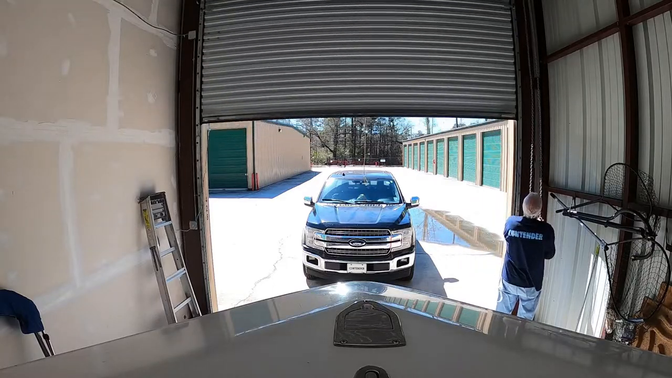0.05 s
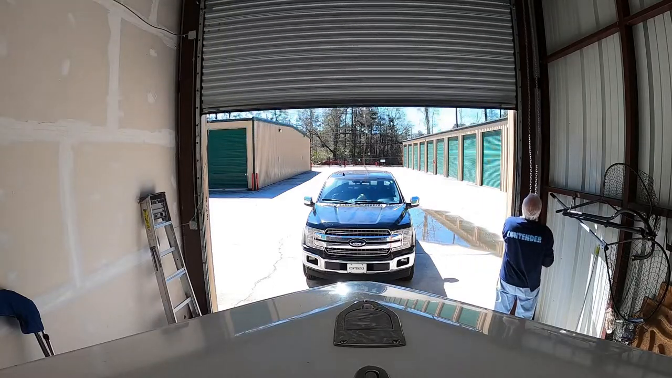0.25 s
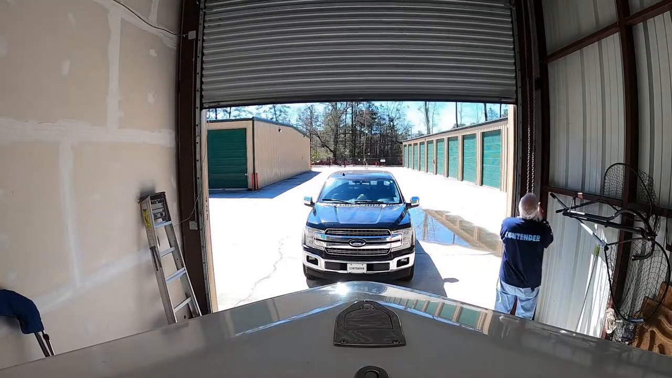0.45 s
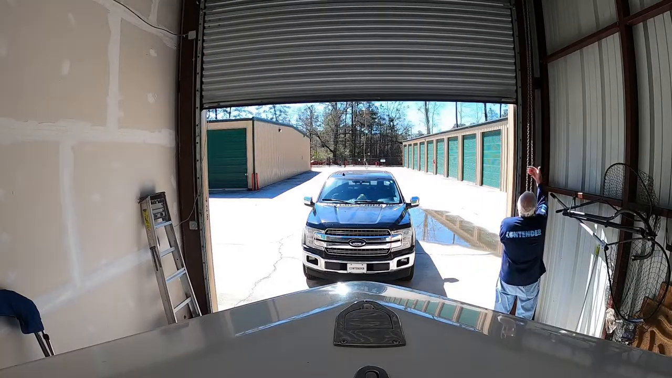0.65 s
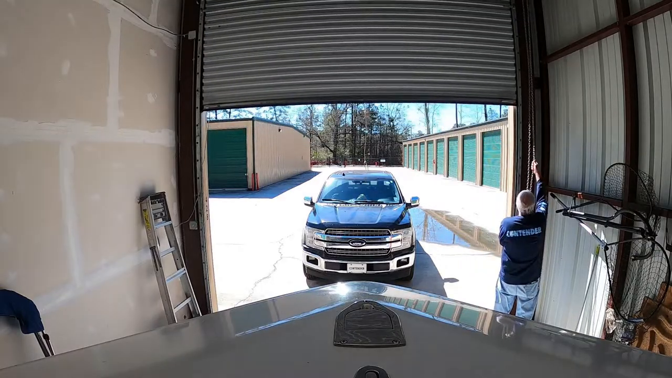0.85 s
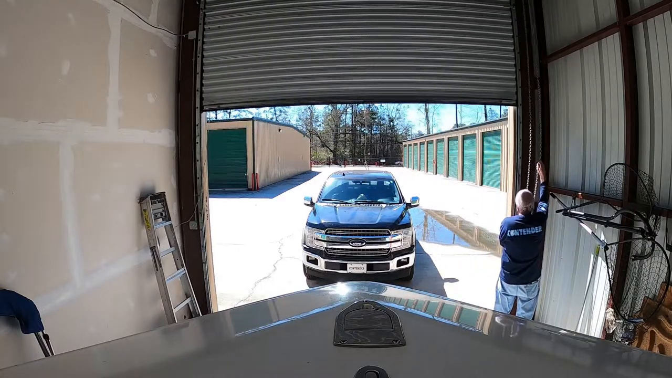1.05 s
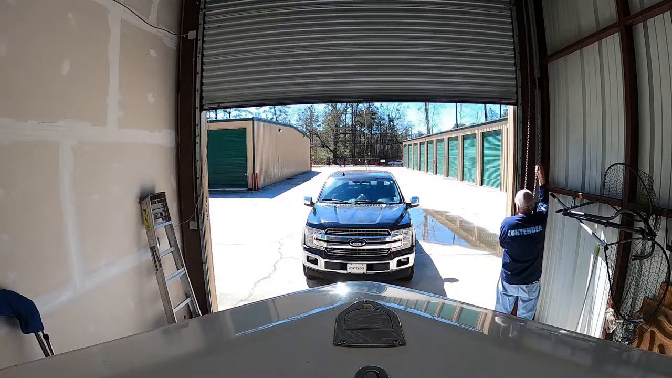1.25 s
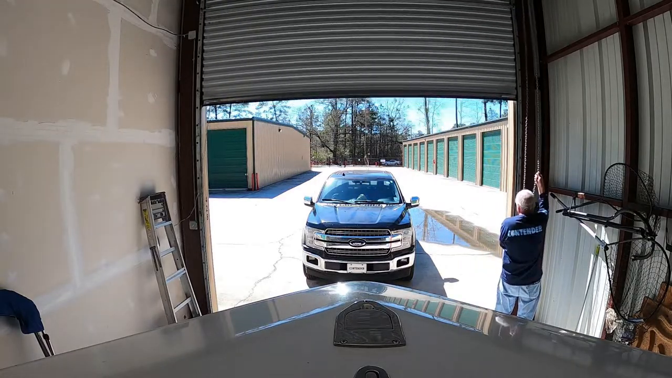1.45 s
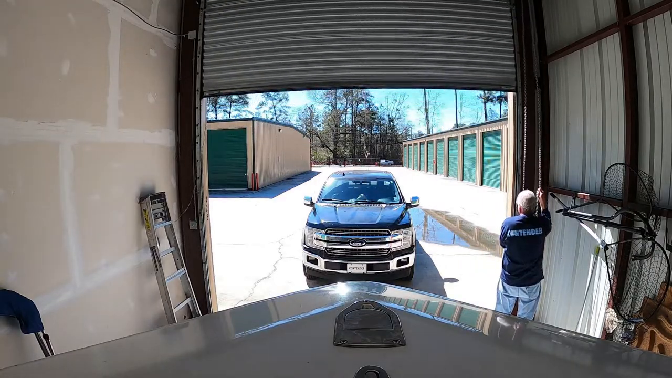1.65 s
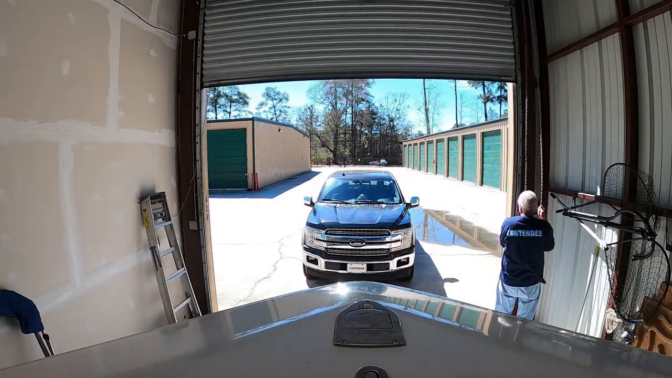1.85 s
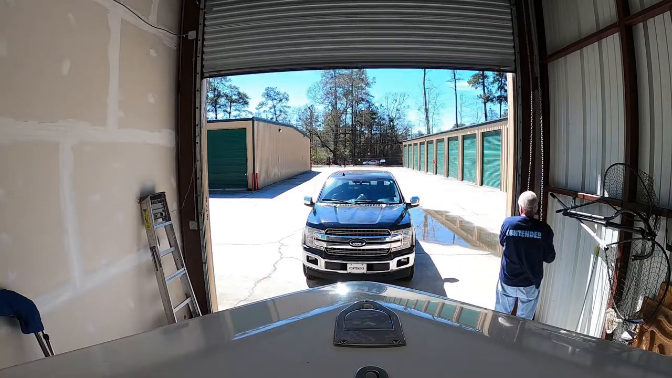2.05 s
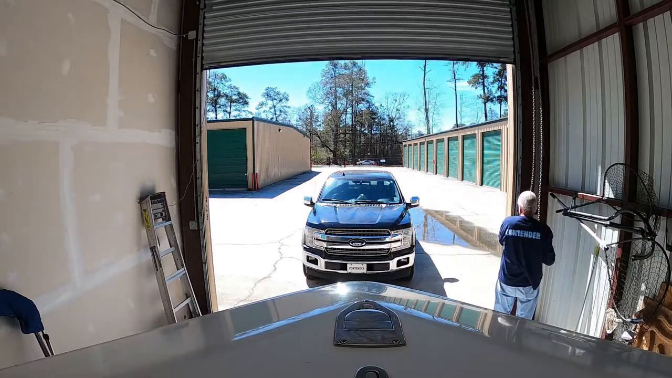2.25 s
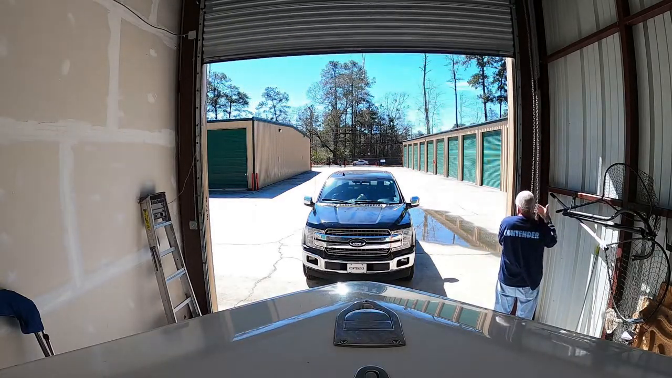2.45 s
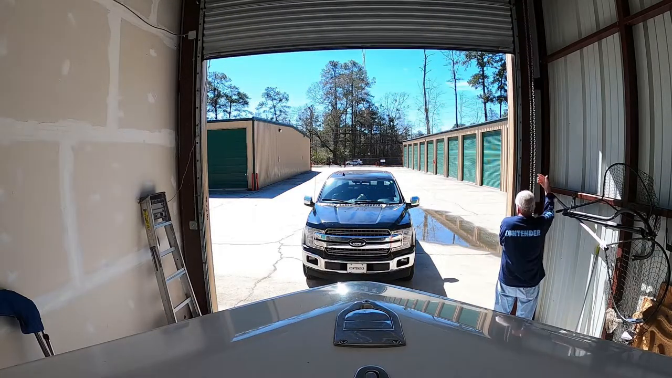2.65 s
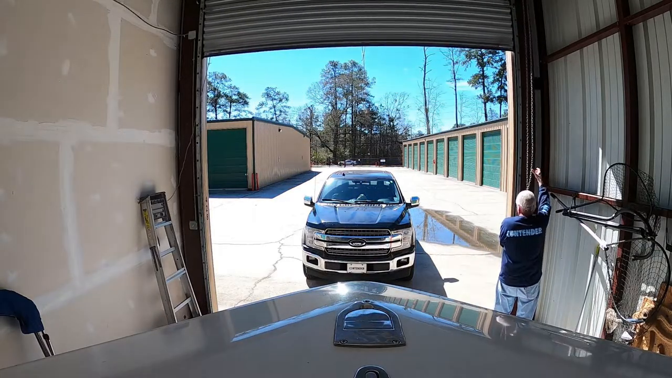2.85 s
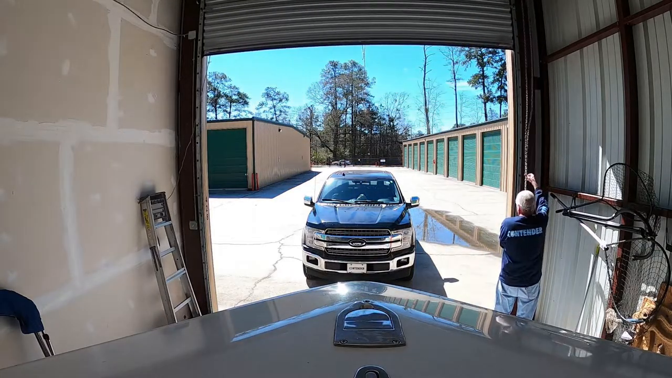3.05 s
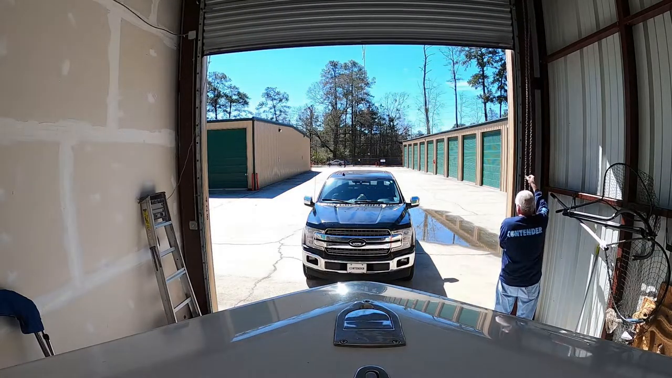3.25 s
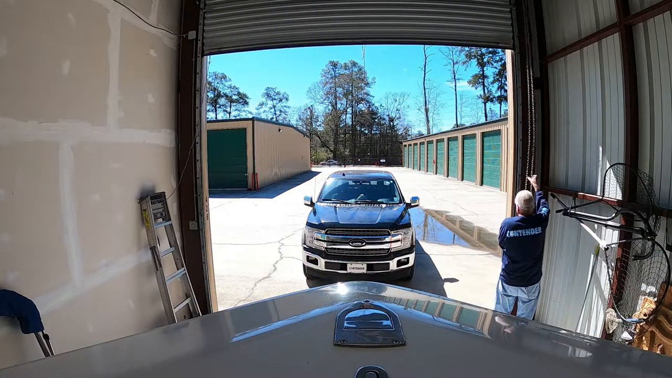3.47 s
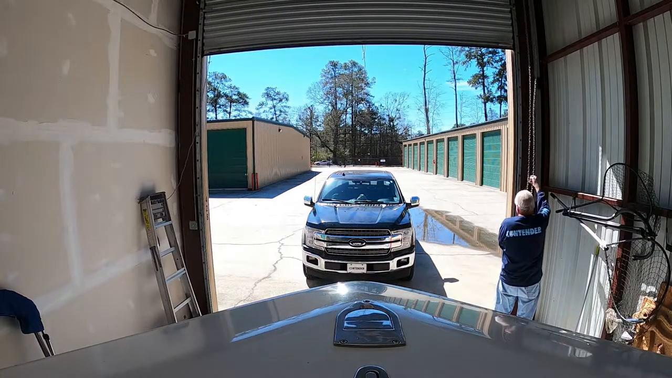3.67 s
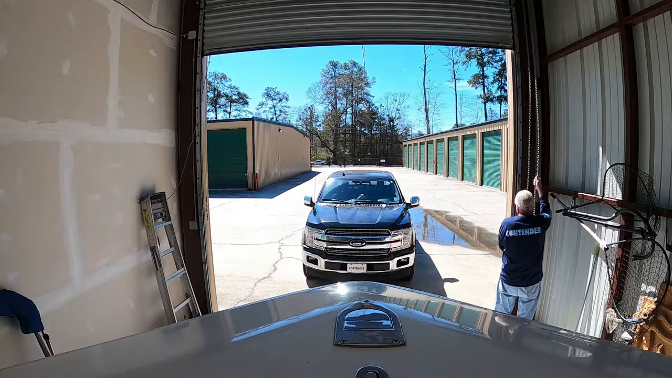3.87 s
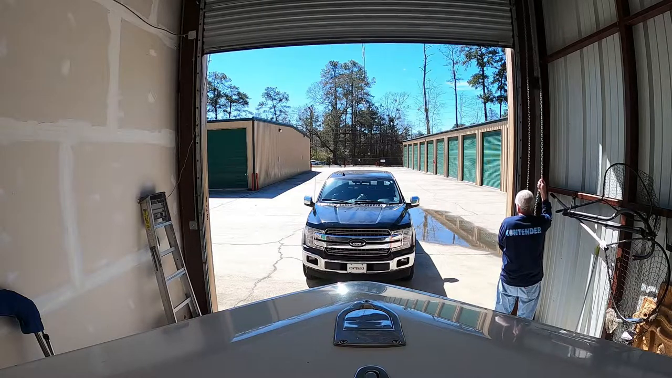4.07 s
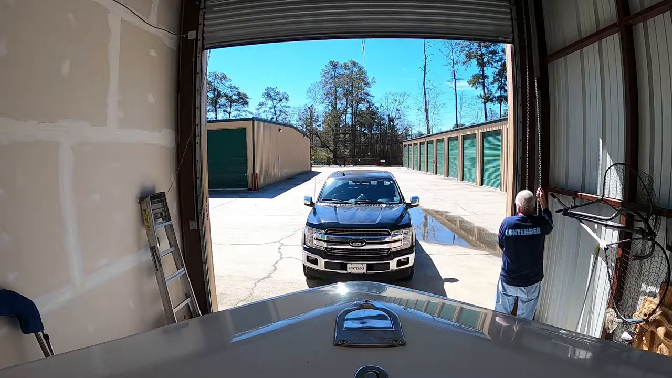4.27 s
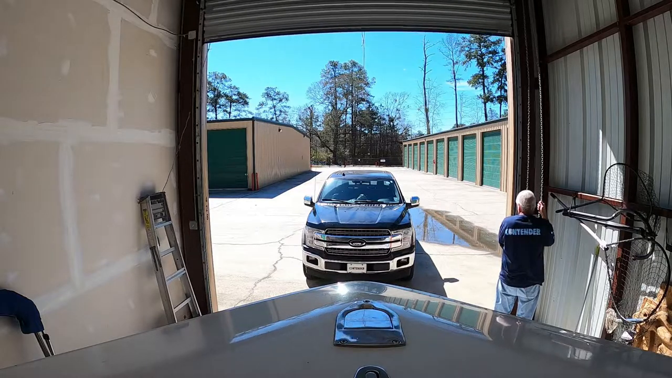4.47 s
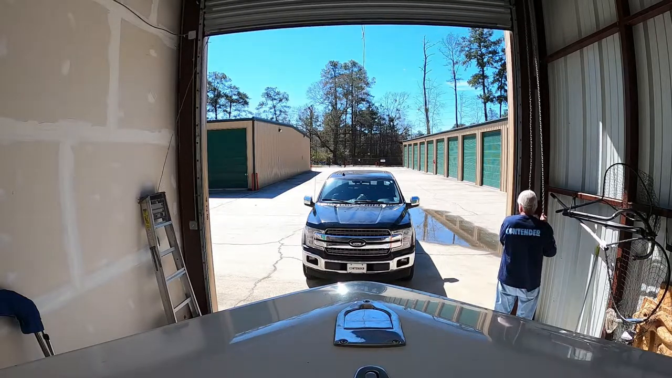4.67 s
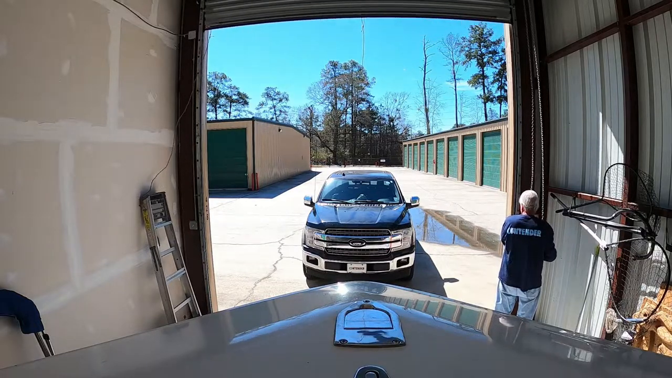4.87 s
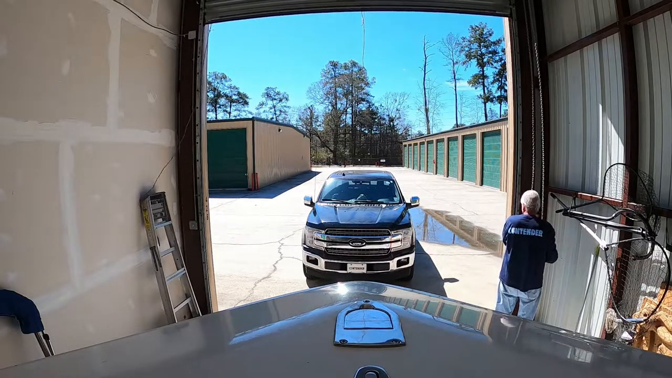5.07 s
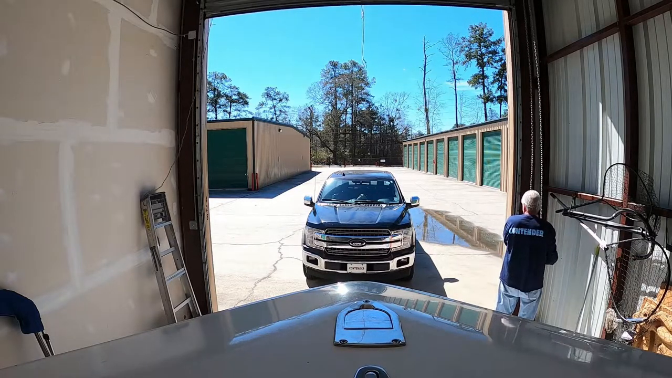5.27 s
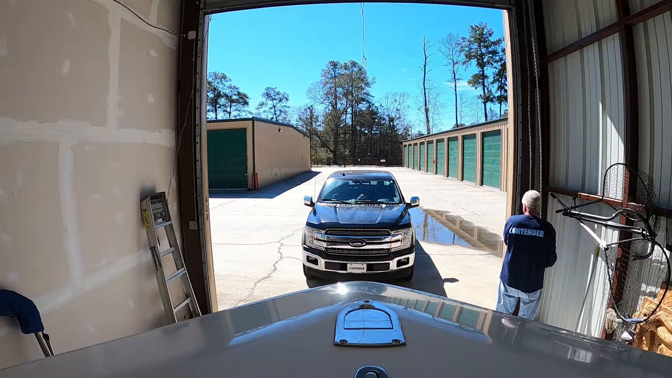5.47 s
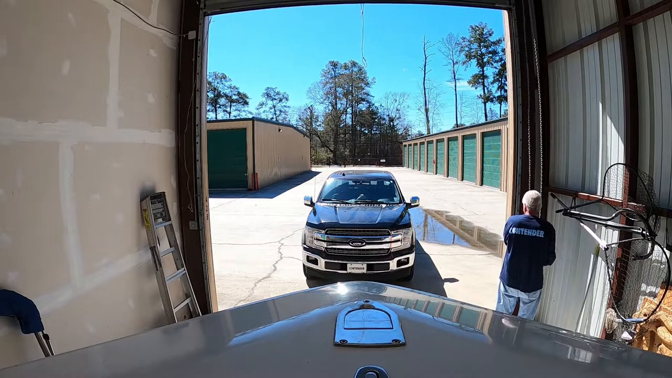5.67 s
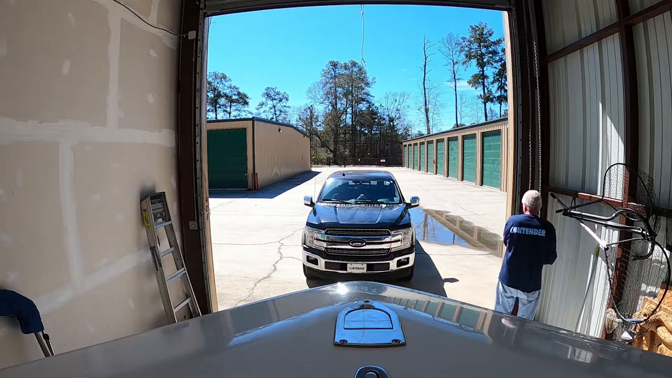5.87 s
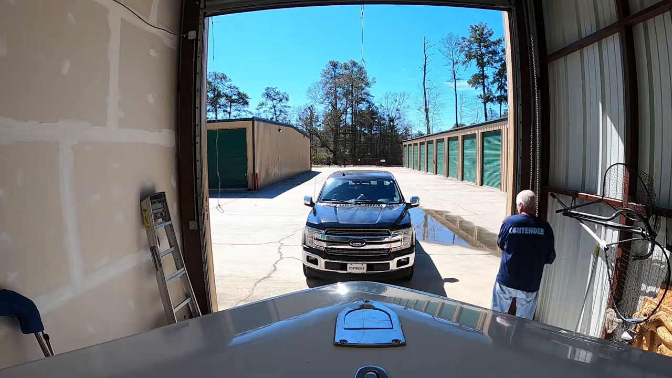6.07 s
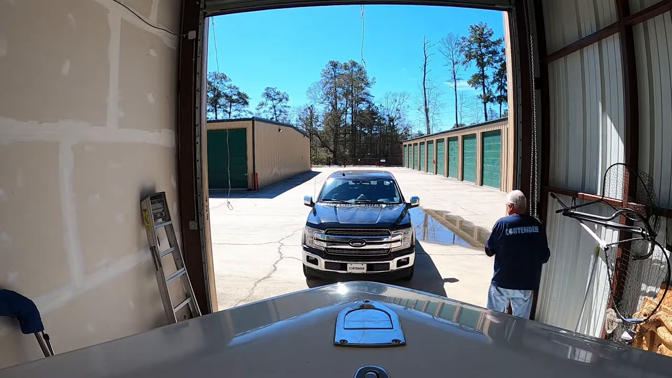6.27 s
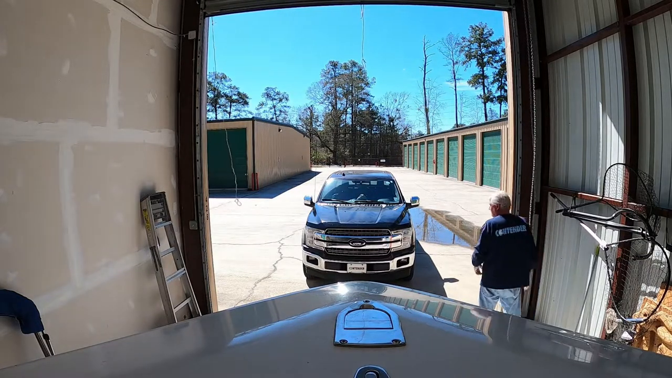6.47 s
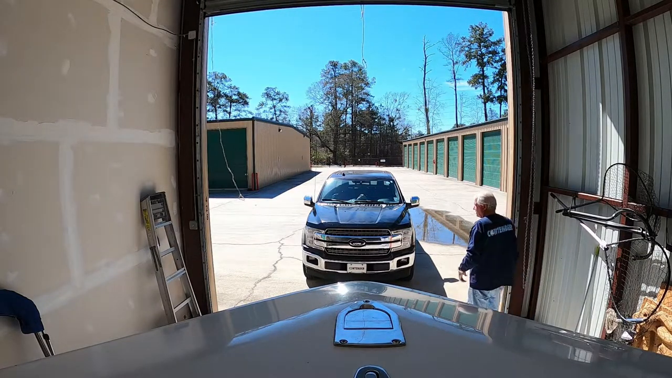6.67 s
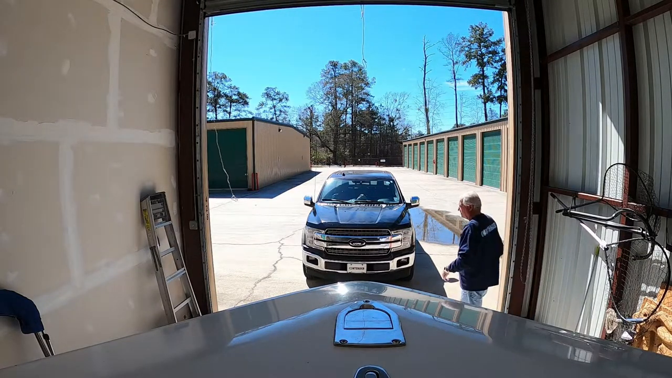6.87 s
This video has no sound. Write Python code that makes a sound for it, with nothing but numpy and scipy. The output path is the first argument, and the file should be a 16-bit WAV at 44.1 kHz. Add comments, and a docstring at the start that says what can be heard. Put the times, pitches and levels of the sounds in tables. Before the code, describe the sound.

Three hauls of a ribbed steel shutter, heard close in stereo within a hard, boomy hall. Ribs tick rapidly over the guides, the sheet rumbles and scrapes, loose hardware clanks and chain links chatter. Each burst slows as the pull ends; the longest lull holds only small clinks and distant hum. A downward metallic groan leads the last haul, which ends in heavy bangs, then a few tiny settling ticks and one soft late knock.

```python
"""Metal storage building: a corrugated steel roll-up door is hauled up by its hand chain in three pulls.
Contacts follow the door speed: ribs tick over the guides, the curtain rumbles, rattles and scrapes, the
roll knocks, hardware clanks with short ringing modes, the chain chatters. Timed noise bursts make bangs,
clacks and small ticks. As the last pull takes hold, a swept tone makes a low falling whoop in the sheet.
Decaying noise is the bare hall's answer to the contacts; a faint outdoor hum comes through the opening."""
import sys
import numpy as np
from scipy import signal
from scipy.fft import rfft, irfft, next_fast_len
from scipy.io import wavfile

SR = 44100
rng = np.random.default_rng(int(sys.argv[2]) if len(sys.argv) > 2 else 0)


def put_to_file(sound):
    """Save the sound as 16-bit audio at rate SR, in the file named by the first command-line argument."""
    columns = np.atleast_2d(sound).T  # one column per channel
    safe = np.clip(columns, -1, 1)
    whole_steps = np.round(safe * 32767)
    wavfile.write(sys.argv[1], SR, whole_steps.astype(np.int16))


N = 305172

# broad colour of the sheet steel: (frequency [Hz], gain [dB per Hz])
CURTAIN_COLOUR = [(22, -33.5), (55, -7.5), (85, -2.5), (170, -2), (260, -3), (400, -6), (750, -10),
                  (1000, -10.5), (1300, -13), (2000, -19), (2400, -22.5), (5000, -30), (8500, -41.5),
                  (14000, -53)]
# broad colour of struck steel: (frequency [Hz], gain [dB per Hz])
STRIKE_COLOUR = [(200, -4), (900, -1.5), (1800, 1), (3300, 3.5), (4600, -2), (6500, -4.5), (8500, -6.5),
                 (11000, -19), (15000, -31)]


def amp(db):
    """Decibels to gain."""
    return 10 ** (np.asarray(db) / 20)


def unit(x):
    """Scale to rms 1."""
    return x / np.sqrt(np.mean(x ** 2) + 1e-20)


def along(points, hz):
    """(Hz, value) points read on a log frequency axis."""
    f, v = np.transpose(points)
    return np.interp(np.log(hz + 1), np.log(f + 1), v)


def coloured(x, gain):
    """Minimum-phase (causal) filter with the given gain as a function of frequency."""
    n = x.shape[-1]
    m = 2 * next_fast_len((n + SR // 4) // 2)
    log_gain = np.log(np.maximum(gain(np.fft.rfftfreq(m, 1 / SR)), 1e-6))
    cepstrum = irfft(log_gain, m)
    cepstrum[1:m // 2] *= 2  # fold onto positive time
    cepstrum[m // 2 + 1:] = 0
    return irfft(rfft(x, m) * np.exp(rfft(cepstrum)), m)[..., :n]


def band(hz, low_hz, high_hz, order=4):
    """Gain of a band-pass."""
    below = (low_hz / (hz + 1)) ** (2 * order)
    above = (hz / high_hz) ** (2 * order)
    return 1 / np.sqrt((1 + below) * (1 + above))


def ringing(modes, hz):
    """Gain of a set of resonances (centre Hz, width Hz, dB), summed in power."""
    power = sum((amp(db) * hz * width) ** 2 / ((centre ** 2 - hz ** 2) ** 2 + (hz * width) ** 2)
                for centre, width, db in modes)
    return np.sqrt(power)


def panel(spectrum, hz):
    """A broad colour with the curtain's resonances standing out of it."""
    # curtain resonances: (centre [Hz], width [Hz], height above the colour [dB])
    panel_modes = [(81, 9.2, 8), (121, 21, 5), (158, 14, 2), (204, 37, 2), (356, 26, 0), (941, 50, 4),
                   (1476, 80, 2.5), (1695, 66, 4), (2080, 45, 3.5), (4390, 160, 3), (4880, 250, 4)]
    peaks_db = sum(db / (1 + (2 * (hz - centre) / width) ** 2) for centre, width, db in panel_modes)
    return amp(along(spectrum, hz) + peaks_db)


def spot(hz, depth_db):
    """Each spot on the steel favours resonances of its own, drawn at random."""
    knots_hz = np.arange(0, SR / 2, 70)
    gain = amp(depth_db * rng.standard_normal(len(knots_hz)).clip(-2, 2))
    return np.interp(hz, knots_hz, unit(gain))


def echo():
    """Mid and side of the hall's diffuse tail, each near unit energy; bass lasts longest, the top dies first."""
    # reverberation: (frequency [Hz], t60 [s])
    hall_t60 = [(80, 1.94), (250, 0.43), (700, 0.59), (2000, 0.51), (5000, 0.45), (9000, 0.32),
                (15000, 0.2)]
    hz, t, z = signal.stft(rng.standard_normal((2, SR * 3 // 4)), SR, nperseg=256)
    decay = amp(-60 * t / along(hall_t60, hz)[:, None])
    tail = signal.istft(z * decay, SR, nperseg=256)[1]
    rise_s = 0.0051
    tail *= 1 - np.exp(-np.arange(tail.shape[1]) / (rise_s * SR))
    return tail / np.linalg.norm(tail[0])


def hall(x, wet_db):
    """Mid and side of a sound in the hall: direct path plus tail, the mid path of unit energy."""
    paths = amp(wet_db) * echo()
    paths[0, 0] += 1
    return signal.fftconvolve(x[None], paths / np.linalg.norm(paths[0]), axes=1)


def add(track, s, sound):
    """Mix a sound in at time s."""
    part = track[:, max(round(s * SR), 0):][:, :sound.shape[1]]
    part += sound[:, :part.shape[1]]


def roaming(x, wet_db, count=12, vary_db=0):
    """The contact points move: each stretch of sound meets a different echo and may ring differently."""
    out = np.zeros((2, N))
    for k, piece in enumerate(np.array_split(x, count)):
        heard = hall(piece, wet_db)
        if vary_db:
            heard = coloured(heard, lambda hz: spot(hz, vary_db))
        add(out, k * N / count / SR, heard)
    return out


def contacts(rate_hz, scatter, spread_db, t60):
    """A train of short gritty noise contacts of uneven size and spacing, rms 1."""
    rate_hz = np.maximum(rate_hz, 1)
    turns = np.cumsum(rate_hz) / SR
    late, size = rng.standard_normal((8000, 2)).T
    count = min(int(turns[-1]), len(late))
    at = np.searchsorted(turns, np.arange(count) + scatter * late[:count]).clip(0, N - 1)
    size_db = spread_db * np.minimum(size[:count], 1.5)  # largest contact: 1.5 standard deviations
    # energy per contact shrinks as the rate grows
    power = np.bincount(at, amp(size_db) ** 2 / np.maximum(rate_hz[at], 30), N)
    power = signal.lfilter([1], [1, -amp(-60 / (t60 * SR)) ** 2], power)
    return unit(np.sqrt(power) * rng.standard_normal(N))


def blow(t60, wet_db, attack_s):
    """A short chattering noise contact with the hall's answer, unit energy in the mid."""
    sound = amp(wet_db) * echo()
    t = np.arange(sound.shape[1]) / SR
    burst = rng.standard_normal(sound.shape) * amp(-60 * t / t60) * (1 - np.exp(-t / attack_s))
    ragged_db = 4 * np.interp(t, np.arange(200) * .004, rng.standard_normal(200))  # rebounds
    burst *= amp(ragged_db)
    sound += burst / np.linalg.norm(burst[0])
    return sound / np.linalg.norm(sound[0])


def door_speed():
    """Ribs passing the guide per second: each pull drives the door, which then coasts to rest."""
    # door speed while hauled, one table per pull: (time [s], speed [ribs/s])
    pull_speeds = [
        [(0, 86.5), (.28, 60.4), (.55, 25.2), (.67, 8.9), (.85, 13.8), (1.05, 9.1), (1.15, 4.8)],
        [(1.22, 5.55), (1.48, 29.8), (1.58, 47.4), (1.68, 77), (2.0, 80.6), (2.33, 70), (2.55, 32.3),
         (2.75, 15.6)],
        [(3.95, 3.7), (4.17, 9.8), (4.38, 58.4), (4.7, 68.3), (4.88, 35.2), (5.3, 30), (5.43, 57.2),
         (5.52, 46.3), (5.63, 6.9)],
    ]
    coast_s = .26  # fall by 1/e
    creep_hz = 0.24  # the door never hangs quite still
    t = np.arange(N) / SR
    speeds = []
    for s, hz in map(np.transpose, pull_speeds):
        coast = np.exp(-np.maximum(t - s[-1], 0) / coast_s)
        speeds.append(np.interp(t, s, hz, left=0) * coast)
    return np.maximum(np.max(speeds, axis=0), creep_hz)


def wound(speed):
    """Share of the travel already wound on the drum, 0-1."""
    return np.cumsum(speed) / np.sum(speed)


def driven(speed, full_db, tenfold_db, wound_db):
    """Gain of a part: full_db at 80 ribs/s, tenfold_db per tenfold speed, wound_db gained once fully wound."""
    return amp(full_db + tenfold_db * np.log10(speed / 80) + wound_db * wound(speed))


def lingering(gain):
    """The sheet stores the energy it is fed and loses it slowly."""
    sheet_t60_s = .8
    keep = amp(-60 / (sheet_t60_s * SR)) ** 2
    start = [keep * gain[0] ** 2]
    return np.sqrt(signal.lfilter([1 - keep], [1, -keep], gain ** 2, zi=start)[0])


def outdoors():
    """Steady distant noise with a low drone in it, coming through the opening."""
    # outdoor noise: (frequency [Hz], gain [dB per Hz])
    outdoor_colour = [(22, 1.5), (60, -8), (90, -2.5), (135, -18), (195, 1), (250, -3.5), (350, -12.5),
                      (620, -17), (1020, -10), (1400, -14.5), (2000, -24), (3000, -31), (4200, -40.5),
                      (14000, -56)]
    noise = rng.standard_normal((2, N))
    return amp(-45.5) * unit(coloured(noise, lambda hz: amp(along(outdoor_colour, hz)) * band(hz, 19.0, 8400)))


def sway(speed):
    """The long hanging sheet flaps and pushes air, less so once it is wound up."""
    air = unit(coloured(rng.standard_normal((2, N)), lambda hz: band(hz, 31, 50)))
    return air * lingering(driven(speed, full_db=-38, tenfold_db=12.6, wound_db=-1.5))


def ticks():
    """Settling hardware makes tiny hard contacts, too short and light to stir the hall much."""
    # settling ticks: (time [s], level [dB])
    tick_events = [(3.739, -78), (6.116, -87), (6.14, -83), (6.161, -90), (6.321, -85), (6.339, -88)]
    out = np.zeros((2, N))
    for s, db in tick_events:
        contact = blow(t60=.012, wet_db=-9, attack_s=.0005)
        add(out, s, amp(db) * unit(coloured(contact, lambda hz: band(hz, 3700, 6600, order=6))))
    return out


def clatter(speed, count=8):
    """Loose hardware clanks at random, each clank with its own modes, faster and harder as the door runs."""
    clanks_per_rib, idle_clank_hz = .7, 18
    low_hz, high_hz = 750, 9000  # range of the modes
    clank_t60_s, spread_db = .022, 6  # spread: weakest to strongest clank
    turns = np.cumsum(clanks_per_rib * speed + idle_clank_hz) / SR
    t = np.arange(SR // 16) / SR
    hits = np.zeros((1, N))
    draws = rng.random((900, count + 2))[:int(turns[-1])]
    for k, (late, size, *places) in enumerate(draws):
        mode_hz = low_hz * (high_hz / low_hz) ** ((np.arange(count) + places) / count)
        ring = np.sqrt(mode_hz) @ np.sin(2 * np.pi * np.outer(mode_hz, t))
        clank = ring * amp(spread_db * size - 60 * t / clank_t60_s)
        add(hits, np.searchsorted(turns, k + late) / SR, clank[None])
    heard = roaming(hits[0], wet_db=-1, count=30)
    clanks = unit(coloured(heard, lambda hz: panel(STRIKE_COLOUR, hz) * band(hz, 670, 9400, order=2)))
    return clanks * driven(speed, full_db=-36.5, tenfold_db=18.5, wound_db=0)


def jingling():
    """Gain of the slack chain swinging against itself: each swing swells quickly and dies away."""
    # chain swings: (time of peak [s], peak level [dB])
    swing_events = [(1.365, -45), (2.81, -55), (3.289, -64), (3.45, -67), (3.603, -65.5), (6.765, -68)]
    rise_s, fall_s = .014, 0.095  # time constants
    t = np.arange(N) / SR
    return sum(amp(db) * np.exp(-np.maximum((s - t) / rise_s, (t - s) / fall_s)) for s, db in swing_events)


def chain(speed):
    """Links chatter through the hoist wheel; in the slack loop they touch one another and ring thinly."""
    # ringing links: (centre [Hz], width [Hz], gain [dB])
    link_modes = [(7800, 45, 1.5), (10660, 160, -13), (13150, 200, -22)]

    def chatter_gain(hz):
        return panel(CURTAIN_COLOUR, hz) * band(hz, 6600, 10900) * (1 + 0.33 * ringing(link_modes, hz))

    links = roaming(contacts(speed / 2 + 45, scatter=0.3, spread_db=2.5, t60=0.022), wet_db=2)
    chatter = unit(coloured(links, chatter_gain))
    touches = contacts(np.full(N, 45), scatter=0.14, spread_db=6.0, t60=0.014)
    touches = roaming(touches, wet_db=10, count=4)
    ring = unit(coloured(touches, lambda hz: ringing(link_modes, hz) * band(hz, 6100, 14500)))
    return chatter * driven(speed, full_db=-47, tenfold_db=26.8, wound_db=10) + ring * jingling()


def hoist():
    """A link drops into the wheel and the housing rings; a heavier catch brings out its low modes."""
    # hoist housing: (centre [Hz], width [Hz], gain [dB])
    housing_modes = [(1690, 130, -2), (1920, 150, -2), (2640, 260, -7), (3150, 250, -8), (3620, 55, 3),
                     (4900, 350, -12), (6160, 250, -11), (7150, 160, -8)]
    # chain catches: (time [s], level [dB], body below 2 kHz [dB])
    catch_events = [(0.451, -50, -4), (0.967, -53.5, -5), (1.053, -65.5, -2), (3.487, -56, 5),
                    (3.497, -59, -1), (3.517, -63.5, -1), (5.381, -42.5, 4.5)]
    out = np.zeros((2, N))
    for s, db, body_db in catch_events:
        weight = [(2000, body_db), (3400, 0)]
        contact = blow(t60=.028, wet_db=-1, attack_s=.003)
        housing = coloured(contact, lambda hz: ringing(housing_modes, hz) * band(hz, 1070, 7400)
                           * amp(along(weight, hz)))
        add(out, s, amp(db) * unit(housing))
    return out


def clacks():
    """Chain and hardware strike steel and skid briefly: heavy parts have body, links are thin and bright."""
    # strikes: (time [s], level before a common +40 dB [dB], body [dB], brightness [dB])
    clack_events = [(0.004, -38.5, 6, -3), (0.055, -47, 12, -3), (0.081, -44, 13, 3), (0.174, -41, 10, 1),
                    (0.188, -46, 11, 10.5), (0.31, -45, 14, 3), (0.450, -36, 10.5, -4),
                    (0.745, -53, 9.5, -0.5), (0.859, -50.5, -8, -3), (0.967, -52, 3, -3),
                    (1.182, -55.5, -19, -12), (1.353, -46, -6, 1), (1.482, -46.5, 8.5, -9),
                    (1.564, -46, 13, 2), (1.618, -39, 3, 2), (1.639, -31.5, 1, -3),
                    (1.786, -32.5, 2.5, -16), (1.885, -36, 2, -10), (2.056, -36.5, 10, 1),
                    (2.141, -48, 0, -8), (2.329, -27.5, 6, -13), (2.603, -43, 0, -1), (2.705, -54, 0, 7.5),
                    (2.851, -51.5, -6, 2.5), (2.964, -60.5, 8, 4), (3.102, -57, 3, 4),
                    (3.139, -43, -13, -0.5), (3.487, -50.5, -1, -10), (3.506, -58, 11.5, -10),
                    (3.57, -59, 2, -7), (3.739, -71, -20, 9), (3.953, -56.5, 10, -2),
                    (4.045, -45.5, -15, 0.5), (4.197, -48.5, -12, -1), (4.244, -37.5, 2.5, -9),
                    (4.292, -33.5, -18, -3), (4.331, -29.5, -7, -3.5), (4.355, -41, -8, -7),
                    (4.481, -36.5, -6, -25), (4.59, -36, 3, -2), (4.633, -36.5, 1, -1),
                    (4.742, -31.5, -4, -2), (4.985, -56, -13, 10), (5.049, -40, 0, -1),
                    (5.181, -42.5, -15, 3), (5.275, -44, -3, 6), (5.380, -34, 4, -2),
                    (5.455, -30.5, 3.5, -12), (5.62, -49, 1, -6), (5.674, -50.5, 4, 0),
                    (5.705, -55, -8, -2), (5.778, -54, -8, -3), (5.803, -51.5, 5.5, -11),
                    (5.826, -55.5, 2, -13), (5.922, -54.5, -10, -4), (6.115, -72, 13, -4),
                    (6.732, -64, 3, -11)]
    out = np.zeros((2, N))
    for s, db, body_db, bright_db in clack_events:
        weight = [(2400, body_db), (3200, 0.021), (5500, 0.0068), (8000, bright_db)]
        contact = blow(t60=.036, wet_db=1.5, attack_s=.007)
        strike = coloured(contact, lambda hz: panel(STRIKE_COLOUR, hz) * amp(along(weight, hz))
                          * spot(hz, depth_db=1.5))
        add(out, s, amp(db + 40.0) * strike)
    return out


def whoop():
    """The chain jerks taut: the sheet whoops downward, as high bending waves arrive before low ones."""
    start_s, level_db = 3.938, -34.5
    start_hz, sag_s = 335.3, .135  # the pitch falls by 1/e in sag_s
    rise_s, hold_s, fall_s = .014, .145, .03
    groan_ratio, groan_db, groan_t60_s = 1.55, -5, .25  # a second, higher wave that dies sooner
    t = np.arange(SR // 2) / SR
    phase = 2 * np.pi * np.cumsum(start_hz * np.exp(-t / sag_s)) / SR
    groan = amp(groan_db - 60 * t / groan_t60_s) * np.sin(groan_ratio * phase)
    tone = np.sin(phase) + groan
    flutter = 1 + .6 * unit(coloured(rng.standard_normal(len(t)), lambda hz: band(hz, 41.8, 124)))
    envelope = np.minimum(t / rise_s, 1) * np.exp(-np.maximum(t - hold_s, 0) / fall_s)
    out = np.zeros((2, N))
    add(out, start_s, amp(level_db) * hall(envelope * unit(tone * flutter), wet_db=-11.0))
    return out


def ribs(speed):
    """Each corrugation ticks over the guide at the door's speed; single ribs snap hard past it."""
    # ringing guide: (centre [Hz], width [Hz], gain [dB])
    guide_modes = [(1660, 130, 9.5), (1915, 70, 12.5), (2026, 36, 13)]
    # rib snaps: (time [s], level [dB])
    snap_events = [(0.822, -76), (0.965, -58), (1.051, -61), (1.716, -40.5), (1.91, -42.5), (2.806, -58),
                   (3.563, -63), (4.147, -57), (4.333, -50), (4.53, -44.5), (4.884, -53), (4.919, -51),
                   (5.327, -52), (5.383, -45), (5.802, -60.5)]

    def guide_gain(hz):
        return ringing(guide_modes, hz) * band(hz, 550, 4700)

    passing = roaming(contacts(speed, scatter=.05, spread_db=1, t60=.028), wet_db=-8, count=24)
    out = unit(coloured(passing, guide_gain)) * driven(speed, full_db=-36, tenfold_db=25, wound_db=0.54)
    for s, db in snap_events:
        snap = coloured(blow(t60=0.019, wet_db=-8.5, attack_s=0.00085), guide_gain)
        add(out, s, amp(db) * unit(snap))
    return out


def roll(speed):
    """The growing roll knocks hollowly as the ribs settle on one another."""
    knocks = contacts(speed / 2 + 20, scatter=.35, spread_db=4.5, t60=0.026)
    knocks = roaming(knocks, wet_db=2, count=14, vary_db=4)
    hollow = unit(coloured(knocks, lambda hz: band(hz, 230, 475)))
    return hollow * driven(speed, full_db=-43, tenfold_db=6.9, wound_db=4.8)


def bangs():
    """Slack sheet buckles and slaps against the roll: a soft blow swells and booms, a hard one crashes."""
    # slaps: (time [s], level before a common +53 dB [dB], boom before a common -3.5 dB [dB], crash [dB])
    bang_events = [(0.01, -37, 16, -9), (0.194, -19, -1, -4.5), (0.236, -30, 2, -2), (0.46, -24.5, 2, -2),
                   (0.979, -33, 4.5, -12), (1.031, -40.5, 2, -4), (1.26, -45, 14, -32), (1.68, -38, 3, 9),
                   (1.755, -32.5, 11, 1), (2.213, -26.5, -1.5, -7), (2.343, -18.5, 0, -11),
                   (2.44, -32.5, 5, -1), (2.6, -42.5, 14, 1), (3.951, -36.5, -2.5, -11),
                   (4.055, -54, 20.5, -9), (4.353, -40, -11, 6), (4.425, -37, -14, 5.5),
                   (4.47, -38, 18.5, -22), (4.685, -26, 0, -22), (4.744, -20, -0.5, -6.5),
                   (4.865, -29.5, -3, -16), (4.971, -31.5, -5, -8), (5.402, -29, -4, -22),
                   (5.432, -21.5, 2.5, -28), (5.464, -23, 1, -1), (5.492, -28.5, 7.5, 0.5),
                   (5.55, -28, -0.5, -9.5), (5.61, -35, 11, -8.5), (5.775, -49, 3, -16),
                   (5.828, -54.5, -4, 9.5), (6.742, -59, 14, -15)]
    # slapping sheet: (frequency [Hz], gain [dB per Hz])
    slap_colour = [(50, -32.5), (85, -2.5), (200, 1.5), (340, -2.5), (480, -5.5), (950, -4.5),
                   (1600, -10.5), (2400, -21), (5000, -44), (12000, -86)]
    out = np.zeros((2, N))
    for s, db, boom_db, crash_db in bang_events:
        weight = [(180, boom_db - 3.5), (300, 0), (550, 0.021), (900, crash_db)]
        slap = blow(t60=0.075, wet_db=2.0, attack_s=0.001 * amp(boom_db))  # boomier swells more slowly
        slap = coloured(slap, lambda hz: panel(slap_colour, hz) * amp(along(weight, hz)))
        add(out, s, amp(db + 53) * slap)
    return out


def curtain(speed):
    """The sheet rumbles as it bends round the drum, rattles in its tracks and scrapes along them."""
    flex = contacts(speed + 80, scatter=.4, spread_db=1.0, t60=0.051)
    flex = roaming(flex, wet_db=1, count=8)
    rumble = unit(coloured(flex, lambda hz: panel(CURTAIN_COLOUR, hz) * band(hz, 50.0, 229)))
    rumble *= lingering(driven(speed, full_db=-26, tenfold_db=15.7, wound_db=3.2))

    knocks = contacts(speed / 2 + 40, scatter=.35, spread_db=2.5, t60=0.017)
    knocks = roaming(knocks, wet_db=1.0, count=48, vary_db=2)
    rattle = unit(coloured(knocks, lambda hz: panel(CURTAIN_COLOUR, hz) * band(hz, 245, 1710)))
    rattle *= driven(speed, full_db=-25, tenfold_db=20.5, wound_db=0.1)

    grit = contacts(speed + 40, scatter=.3, spread_db=6.0, t60=0.034)
    grit = roaming(grit, wet_db=9.0, count=24)
    scrape = unit(coloured(grit, lambda hz: panel(CURTAIN_COLOUR, hz) * band(hz, 2100, 5000)))
    scrape *= driven(speed, full_db=-37.5, tenfold_db=21, wound_db=2.9)
    return rumble + rattle + scrape


def scene():
    """Two close microphone ports: alike in the bass, apart in the treble, the right one slightly earlier."""
    # stereo width: (frequency [Hz], gain of the side signal [dB])
    side_gain = [(25, -23), (60, -58), (130, -64), (300, -20.5), (700, -12), (1400, -8.5), (3000, -7.5),
                 (6000, -3), (12000, 1)]
    # the bright chain hangs on the right: (frequency [Hz], left minus right [dB])
    left_right = [(125, 0), (250, -.3), (1000, .3), (2000, 1.1), (4000, -1), (8000, -1.5), (12000, -.7)]
    speed = door_speed()
    mix = outdoors() + sway(speed) + ticks() + clatter(speed) + chain(speed) + hoist() + clacks()
    mix += whoop() + ribs(speed) + roll(speed) + bangs() + curtain(speed)
    m = next_fast_len(N + SR // 4)
    hz = np.fft.rfftfreq(m, 1 / SR)
    mid, side = rfft(mix, m)
    side = side * amp(along(side_gain, hz))
    lag_s = 5.2e-5
    lean = amp(along(left_right, hz) / 2)
    left = (mid + side) * lean * np.exp(-2j * np.pi * hz * lag_s)
    right = (mid - side) / lean
    return irfft(np.array([left, right]), m)[:, :N]


def record(dry):
    """Band limit: nothing above top_hz is kept."""
    top_hz = 15600
    m = next_fast_len(N + SR // 4)
    return irfft(rfft(dry, m) * (np.fft.rfftfreq(m, 1 / SR) < top_hz), m)[:, :N]


dry = scene()
out = record(dry)
put_to_file(out)
```